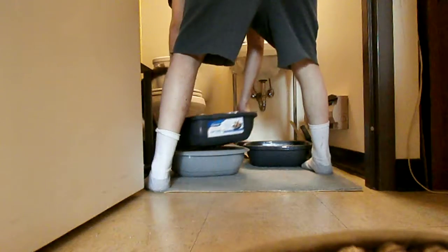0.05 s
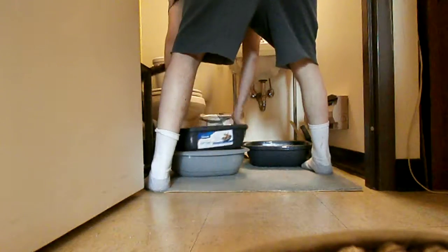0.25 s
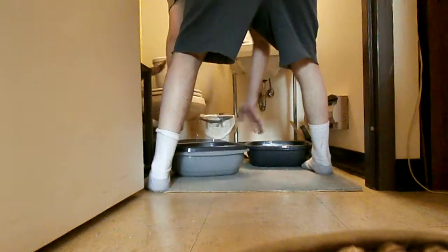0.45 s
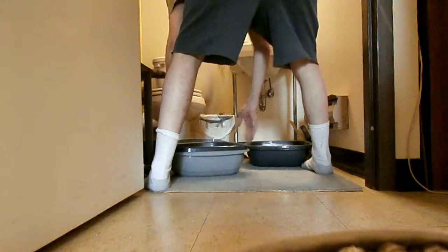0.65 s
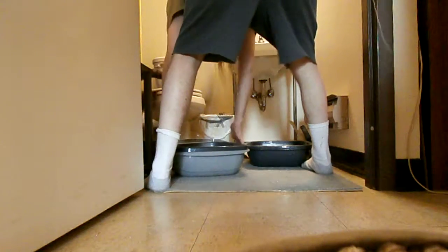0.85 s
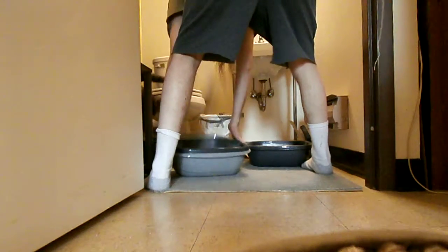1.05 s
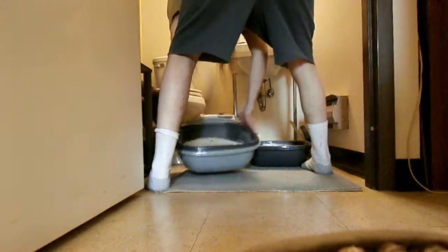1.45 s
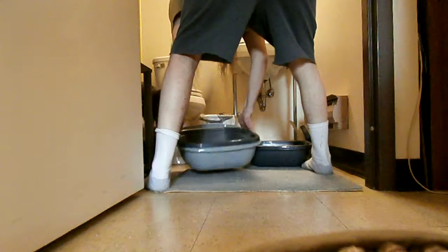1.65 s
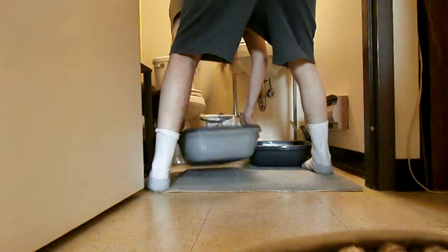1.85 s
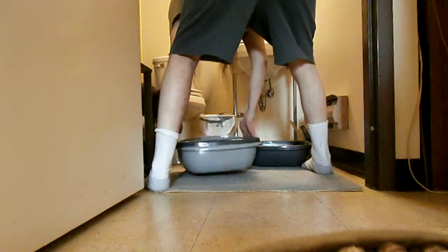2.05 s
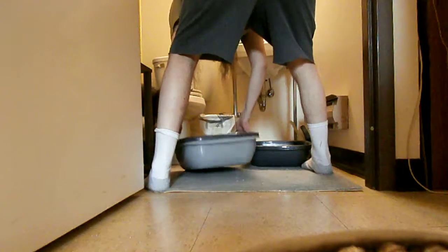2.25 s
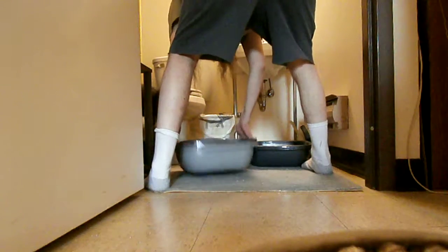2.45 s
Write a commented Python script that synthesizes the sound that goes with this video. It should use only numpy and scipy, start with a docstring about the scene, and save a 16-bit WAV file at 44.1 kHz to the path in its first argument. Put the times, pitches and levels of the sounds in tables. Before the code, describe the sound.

A plastic litter pan drops into another with a clack and a booming thud. Two light knocks follow, then loose litter swishes as the stack is rocked. An extractor fan rushes throughout in the small bathroom.

```python
"""An extractor fan rushes throughout in a small bathroom, under a thin electrical whine.
A plastic litter pan is dropped into another: the rims clack and ring, then the bottom thuds home
and the room booms. A hand grips the stack with two light knocks, lifts it and rocks it, so that
loose litter slides from side to side in swishes of tiny collisions. A hollow hum swells while
the pan is held up, and three thin tones join it and stay to the end."""
import sys
import numpy as np
from scipy import signal
from scipy.fft import rfft, irfft, next_fast_len
from scipy.io import wavfile
from scipy.ndimage import uniform_filter1d, minimum_filter1d

SR = 44100
rng = np.random.default_rng(int(sys.argv[2]) if len(sys.argv) > 2 else 0)


def int16_out(signal):
    """Quantize to a 16-bit WAV file."""
    q = np.round(np.clip(np.atleast_2d(signal).T, -1, 1) * 32767)
    wavfile.write(sys.argv[1], SR, q.astype(np.int16))


N = 114660
TIME = np.arange(N) / SR


def amp(db):
    """Amplitude ratio of a level in decibels."""
    return 10 ** (np.asarray(db) / 20)


def unit(x):
    """Normalisation to rms 1."""
    return x / np.sqrt(np.mean(x ** 2) + 1e-20)


def along(points, hz):
    """Interpolation of (f, value) points on a logarithmic frequency axis."""
    f, values = np.transpose(points)
    return np.interp(np.log(hz + 1), np.log(f + 1), values)


def fade(t, t60):
    """Exponential decay, by 60 dB in t60 seconds."""
    return np.exp(-np.log(1000) * t / t60)


def sine(t, hz):
    """Simple harmonic motion with a random phase."""
    return np.sin(2 * np.pi * (hz * t + rng.random()))


def filtered(x, response):
    """Linear filtering: the spectrum is multiplied by a frequency response."""
    size = next_fast_len(len(x) + SR // 4)
    return irfft(rfft(x, size) * response(np.fft.rfftfreq(size, 1 / SR)), size)[:len(x)]


def coloured(x, spectrum):
    """Spectral shaping by (f, level) points, at rms 1."""
    return unit(filtered(x, lambda hz: amp(along(spectrum, hz))))


def noise(samples, spectrum):
    """Gaussian noise with a given spectral envelope, at rms 1."""
    return coloured(rng.standard_normal(samples), spectrum)


def narrow(centre_hz, half_width_hz):
    """Resonance: one narrow band selected from white noise, at rms 1."""
    white = rng.standard_normal(N)
    return unit(filtered(white, lambda hz: 1 / (1 + ((hz - centre_hz) / half_width_hz) ** 2)))


def add(track, start, sound):
    """Superposition of a sound on a track, from a start time in seconds."""
    i = round(start * SR)
    track[i:i + len(sound)] += sound[:N - i]


# reverberation time of the bathroom (f/Hz, T60/s)
ROOM_DECAY = [(100, 0.15), (280, 0.32), (900, 0.6), (3000, .25), (12000, 0.27)]

def bathroom(x, wet_db, wall_delay_s=0.005):
    """Reverberation: reflections from close walls form a diffuse tail, each band with its own decay."""
    hz, t, bands = signal.stft(rng.standard_normal(SR // 2), SR, nperseg=256)
    tail = signal.istft(bands * fade(t, along(ROOM_DECAY, hz)[:, None]), SR)[1]
    tail = np.pad(tail / np.linalg.norm(tail), (round(wall_delay_s * SR), 0))
    return x + amp(wet_db) * signal.fftconvolve(x, tail)[:len(x)]


# spectrum of the fan's rush (f/Hz, level/dB)
FAN_SPECTRUM = [(15, -50), (30, -29), (55, -16.5), (84, -12), (130, -5.5), (166, -12), (236, -7.5),
                (309, -9.5), (430, -6), (560, -8.5), (700, -9.5), (800, -2.5), (900, -1), (1050, -6.5),
                (1170, -9), (1300, -17), (1550, -16.5), (2100, -15.5), (2550, -15.5), (3700, -18.5),
                (4300, -24), (5000, -28), (6100, -23.5), (7000, -24), (8200, -29.5), (10000, -37.5),
                (12500, -42), (14500, -43), (15800, -44)]

def fan(level_db=-30):
    """Turbulence: steadily moving air radiates stationary broadband noise."""
    return amp(level_db) * noise(N, FAN_SPECTRUM)


def whine(hz=14947, tone_db=-51, skirt_db=-74):
    """Line broadening: a skirt of noise makes a pure electrical tone slightly fuzzy."""
    tone = amp(tone_db) * np.sqrt(2) * np.sin(2 * np.pi * hz * TIME)
    return tone + amp(skirt_db) * narrow(hz, half_width_hz=160)


# envelope of the hollow hum (t/s, level/dB)
HUM_ENVELOPE = [(0, -52), (1.05, -36.5), (1.17, -38), (1.45, -35), (1.62, -37), (1.85, -42), (2.08, -47),
                (2.23, -27.5), (2.36, -36), (2.6, -67)]
# thin steady tones that join it (onset t/s, f/Hz, level/dB)
HUM_TONES = [(1.4, 807.5, -37.5), (1.1, 874, -43), (1.7, 761, -44)]

def hollow_hum(tone_rise_s=0.38):
    """Narrow-band noise is heard as a hollow pitch; it swells and ebbs as pure tones enter near it."""
    tones = sum(amp(db) * np.clip((TIME - onset) / tone_rise_s, 0, 1) * np.sqrt(2) * sine(TIME, hz)
                for onset, hz, db in HUM_TONES)
    envelope = amp(np.interp(TIME, *np.transpose(HUM_ENVELOPE)))
    return envelope * narrow(centre_hz=837, half_width_hz=82) + tones


def grains(spectrum, hits_per_s=9000, spread_db=3.5):
    """Shot noise: countless independent collisions of uneven size."""
    hits = rng.random(N) < hits_per_s / SR
    size = amp(spread_db * np.minimum(rng.exponential(size=N), 5))
    return coloured(hits * size * rng.choice([-1, 1], N), spectrum)


# slides of litter (peak t/s, level/dB, rise t/s, fall t/s, fizz level/dB relative to the scrape)
LITTER_SLIDES = [(0.341, -21.5, 0.0083, 0.095, -4.5), (0.849, -31, 0.0066, 0.071, -3),
                 (1.243, -32, .035, 0.24, 0), (1.35, -32.5, 0.023, 0.097, 4),
                 (1.512, -24, 0.033, 0.16, -18), (1.55, -25, 0.072, 0.1, -1),
                 (1.64, -31.5, 0.032, 0.099, -3.5), (1.825, -33, 0.036, .16, -6.5),
                 (1.986, -27, 0.058, 0.12, -7.5), (2.07, -38, 0.094, 0.27, -2.5),
                 (2.288, -25, 0.028, 0.078, -11.5), (2.315, -38.5, 0.033, 0.059, 2.5)]
# spectra of litter scraping the plastic, and of grain fizzing on grain (f/Hz, level/dB)
SCRAPE_SPECTRUM = [(150, -35), (400, -12.5), (600, -3), (900, -1.5), (1200, -5), (1500, -10.5),
                   (2000, -3.5), (2600, -2.5), (3700, -7.5), (4800, -19.5), (7000, -14.5), (12000, -56)]
FIZZ_SPECTRUM = [(1000, -20), (3000, -8), (4000, -7), (5100, -14), (6100, -4), (7000, -4.5), (8200, -10),
                 (10000, -16), (13000, -22.5), (16000, -35)]

def litter():
    """Granular flow: slides gather speed and trickle out; being incoherent, they add in power."""
    scrape_power, fizz_power = np.zeros(N), np.zeros(N)
    for peak, db, rise, fall, fizz_db in LITTER_SLIDES:
        before, after = np.minimum(TIME - peak, 0), np.maximum(TIME - peak, 0)
        flow = amp(db) * np.exp(-(before / rise) ** 2 - 2 * after / fall)
        scrape_power += flow ** 2
        fizz_power += (flow * amp(fizz_db)) ** 2
    scrape = np.sqrt(scrape_power) * grains(SCRAPE_SPECTRUM)
    fizz = np.sqrt(fizz_power) * grains(FIZZ_SPECTRUM)
    return bathroom(scrape + fizz, wet_db=-7)


# pushes on the floor (t/s, level/dB, half length t/s, boom level/dB relative to the push)
FLOOR_PUSHES = [(0.271, -29, 0.00063, -1), (0.302, -14, 0.00095, -10), (0.3342, 4, 0.00083, -17.5)]
# spectrum of the small room's boom (f/Hz, level/dB)
BOOM_SPECTRUM = [(40, -30), (80, 5), (130, 3), (190, 1), (270, 1), (400, -3), (800, -16)]

def thuds(boom_t60_s=0.27):
    """Impulse response: stopping the weight sends out one low pressure pulse, and the room booms."""
    out = np.zeros(N)
    for centre, db, half_length, boom_db in FLOOR_PUSHES:
        u = (TIME - centre) / half_length
        push = amp(db) * u * np.exp((1 - u * u) / 2)  # derivative of a Gaussian
        tail = noise(SR, BOOM_SPECTRUM) * fade(TIME[:SR], boom_t60_s)
        boom = signal.fftconvolve(push, tail / np.linalg.norm(tail))[:N]
        out += push + amp(boom_db) * boom
    return out


# contacts of the pans (t/s, ring level/dB, crack level/dB, snap level/dB,
# most strongly excited f/Hz, fraction of the free ring time)
PAN_CONTACTS = [(0.227, -13.5, -30, -50, 760, 0.69), (.268, -7.5, -16.5, -16.5, 557, 0.49),
                (0.277, -8, -24, -40, 970, 0.96), (0.2995, 0, -10.5, -17, 1110, 1),
                (.3035, -4.5, -9, -31, 506, 0.97), (.334, -4, -13.5, -10, 270, 0.67),
                (0.377, -6.5, -38, -50, 288, 0.88), (.839, -40, -28, -27, 1000, 0.36),
                (0.888, -15.5, -34, -45, 402, 0.34)]
# modes of the loaded pan (f/Hz, level/dB, T60/s)
PAN_MODES = [(128, 12, 0.067), (193, -16, 0.13), (250, -12.5, .33), (292.5, -5.5, 0.19), (373, 5, 0.03),
             (457, -1.5, 0.06), (545, -5, .07), (641, -2, 0.037), (884, -4, 0.051), (955, -5, 0.035),
             (1020, -9.5, 0.094)]
# spectra of a rim's crack and of its brighter snap (f/Hz, level/dB)
CRACK_SPECTRUM = [(40, -33), (200, -4), (600, 5), (1000, 4.5), (1500, -6), (2000, 2), (2600, 4),
                  (3700, 0.5), (4900, -15.5), (6700, -6), (9500, -23.5), (15500, -43)]
SNAP_SPECTRUM = [(1500, -21), (3000, 0), (4900, -8), (6800, 4), (9500, -9), (15500, -18)]

def knocks(contact_octaves=0.78, rattle_db=-7):
    """Impact excitation: each contact cracks, rings the modes near its pitch and jolts the litter."""
    out, t = np.zeros(N), TIME[:SR // 2]
    crack_envelope = fade(t, t60=0.031) + amp(rattle_db) * fade(t, t60=0.12)  # the litter rattles on
    for start, ring_db, crack_db, snap_db, contact_hz, ring_fraction in PAN_CONTACTS:
        ring = np.zeros(len(t))
        for hz, db, t60 in PAN_MODES:
            excitation = 1 / (1 + (np.log2(hz / contact_hz) / contact_octaves) ** 4)
            ring += amp(db) * excitation * fade(t, t60 * ring_fraction) * sine(t, hz)
        ring *= 1 - np.exp(-(t * contact_hz * 2) ** 2)  # builds up in about half a period
        crack = noise(len(t), CRACK_SPECTRUM) * crack_envelope
        snap = noise(len(t), SNAP_SPECTRUM) * fade(t, t60=0.018)
        knock = amp(ring_db) * ring + amp(crack_db) * crack + amp(snap_db) * snap
        add(out, start, bathroom(knock, wet_db=-4.5))
    return out


def limited(x, ceiling_db=-3, hold_s=0.05, release_db_per_s=130):
    """Peak limiting: the gain drops just ahead of a loud peak, holds, then recovers steadily."""
    needed_db = np.minimum(ceiling_db - 20 * np.log10(np.abs(x) + 1e-9), 0)
    hold, ahead = round(hold_s * SR), SR // 2000
    held_db = minimum_filter1d(needed_db, hold, origin=hold // 2 - ahead)
    recovery_db = release_db_per_s * TIME
    gain_db = np.minimum.accumulate(held_db - recovery_db) + recovery_db
    return x * amp(uniform_filter1d(gain_db, ahead))


def scene():
    """Superposition: the pressures of all sources add in one channel."""
    return (knocks() + thuds() + litter() + hollow_hum() + fan() + whine())[None]


def record(dry):
    """Peak and band limiting: the blows are held down and the highest treble is cut off."""
    return filtered(limited(dry[0]), lambda hz: hz < 15950)[None]


dry = scene()
out = record(dry)
int16_out(out)
```